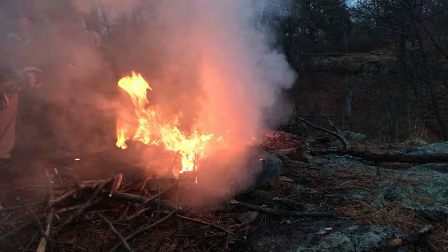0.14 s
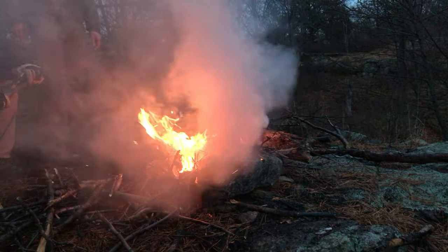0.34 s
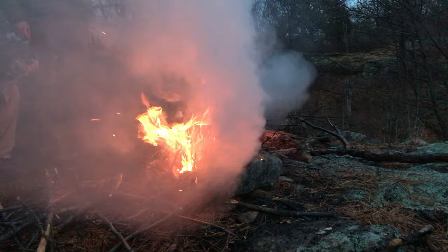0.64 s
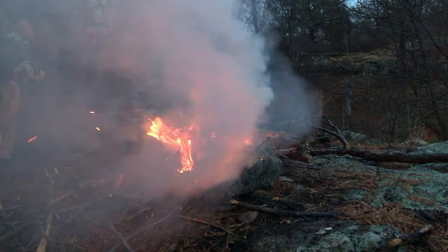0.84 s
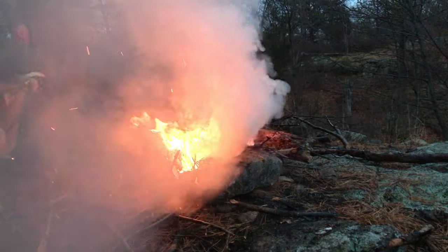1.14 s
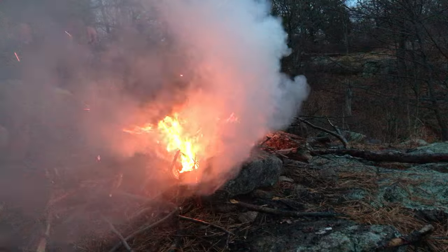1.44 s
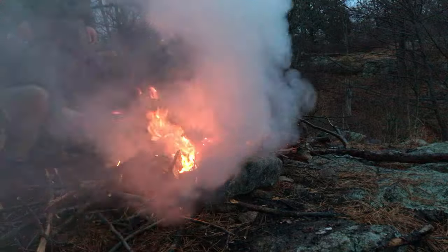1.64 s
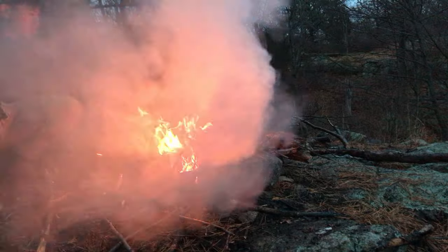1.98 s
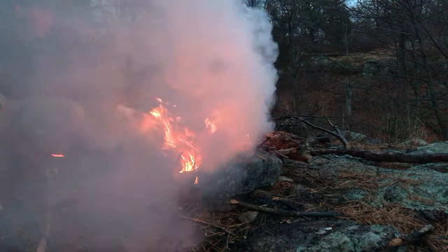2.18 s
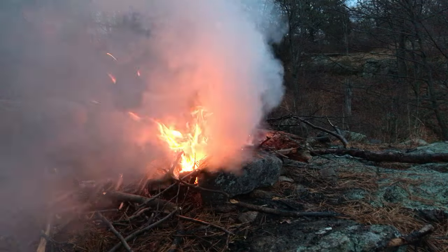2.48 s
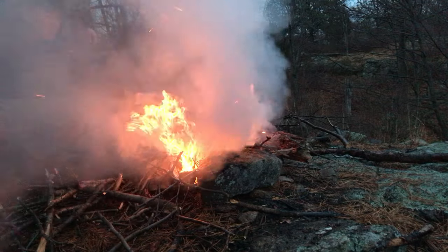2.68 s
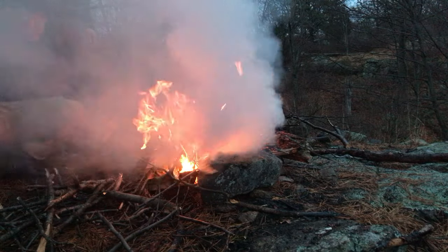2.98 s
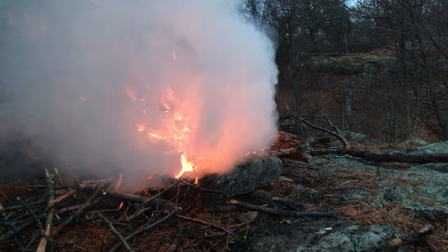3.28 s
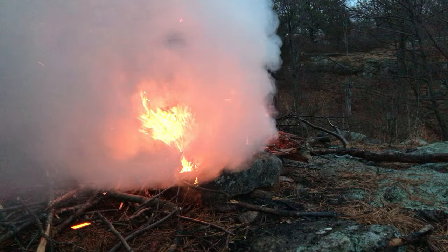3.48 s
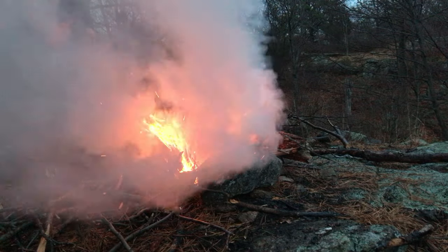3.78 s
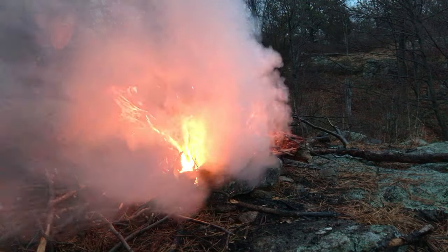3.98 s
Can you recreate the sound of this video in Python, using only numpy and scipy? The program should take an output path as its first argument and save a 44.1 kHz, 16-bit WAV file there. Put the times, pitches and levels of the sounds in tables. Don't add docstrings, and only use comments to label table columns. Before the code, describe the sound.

Dry needles and twigs burn hard outdoors, heard from a phone a few metres away. A low, soft flame roar and airy steam hiss run throughout, filled with countless tiny ticks. The opening has small clicks, and a very faint, very high sap whistle sinks slightly from 0.35 to 0.5 seconds. A hard crack bursts at 0.6 with a brief steam jet, followed by pops at 0.68 and 0.75. Sputtering hiss builds near 1.3, then a sharp snap lands at 1.36. Twigs tear and knock at 1.6 to 1.67; another very loud pop hits at 1.88, trailed by a dense clatter until 2.02. Lighter pops follow at 2.24 and 2.45, with a woody, ringing cluster around 2.6 to 2.7 and a knock near 2.85. From 3 seconds only sparse ticks and rustles remain, until a bright, tight double-step pop at 4.1. Short diffuse echoes come off ground and trunks.

```python
import sys
import numpy as np
from scipy import signal
from scipy.fft import rfft, irfft, next_fast_len
from scipy.io import wavfile
from scipy.ndimage import uniform_filter1d

SR = 44100
rng = np.random.default_rng(int(sys.argv[2]) if len(sys.argv) > 2 else 0)


def makeup_ratio(level_db):
    decades = np.asarray(level_db, float) / 20
    return 10 ** decades


def dump_mix(stems):
    frames = np.atleast_2d(stems).T
    limited = np.clip(frames, -1, 1)
    pcm = np.round(limited * 32767).astype(np.int16)
    wavfile.write(sys.argv[1], SR, pcm)


N = 181850

# centre in Hz, width in Hz, level in dB.
SNAP_MODES = [(1707, 950, -4), (2500, 3730, -5), (3590, 1680, -1), (4300, 1070, -7)]
SPIT_MODES = [(12550, 6600, -4), (15070, 4100, -7.5)]
# centre in Hz, width in Hz, level in dB.
TWIG_KNOCK_MODES = [(296, 700, -4.5), (500, 620, -2.5), (773, 420, -5.5), (1154, 870, -7)]
TWIG_CRACK_MODES = [(6100, 2300, -2.5), (8300, 2800, -7.5)]
TWIG_PARTS = (TWIG_KNOCK_MODES, SNAP_MODES, TWIG_CRACK_MODES, SPIT_MODES)


def ring(x, hz, width):
    b, a = signal.iirpeak(hz, hz / width, fs=SR)
    once = signal.lfilter(b, a, x + 1e-18)
    return signal.lfilter(b, a, once)


def unit(x):
    return x / np.sqrt(np.mean(x ** 2))


def norm(x):
    return np.linalg.norm(x, axis=-1, keepdims=True)


def walk(rate):
    hold = int(SR / rate)
    stairs = np.repeat(rng.standard_normal(N // hold + 1), hold)[:N]
    return 1.4 * uniform_filter1d(uniform_filter1d(stairs, hold), hold)


def pops():
    # start in seconds, energy in dB, brightness, narrowness, length in ms.
    resin_pockets = [(.202, -45, 0.3, -2.5, 1.7), (.4804, -40, 7.5, 1.8, 1.8), (.6006, -9.5, -1, 2, 1.4),
                     (.6779, -24.5, 1, 0.6, 0.22), (.7537, -20.5, 5.5, 0.54, 1.3),
                     (.8488, -39, 8.5, 1.4, 1.8), (1.154, -45, 4.5, -1, 1.3),
                     (1.1841, -35.5, 8.5, 2.5, 2.2), (1.3571, -13, 3.5, -.5, 0.45),
                     (1.417, -36.5, 5.5, 2.5, 0.42), (1.4816, -33.5, 10.5, 3, 0.16),
                     (1.5484, -27.5, 9.5, 0.64, 0.72), (1.8152, -39.5, 1, -1.5, 6.1),
                     (1.8402, -34, 0.5, 0, 3.1), (1.8653, -35, -6, 11, .8), (1.8806, -11.5, 0.7, 2, 0.58),
                     (1.954, -26, -6, 11, 1.8), (1.9617, -28.5, -1.3, 2, 4), (1.9803, -29.5, -3.5, 1.5, 5),
                     (1.9922, -43.5, -3, -2, 1.8), (2.2425, -30.5, 7, -0.15, 0.37),
                     (2.447, -29, 5.5, 1, 1.1), (2.672, -38, -4, -1, 1.2), (2.8348, -38, 3, -1, 0.27)]
    last_pop = [
        (4.0966, -54, 7, -3.5, .23),
        (4.0984, -32, 4, -3.5, 0.15),
    ]
    # start in seconds, energy in dB, brightness.
    resin_spits = [(.078, -51.5, 6.5), (0.289, -56.5, 9), (.7284, -52, 7), (0.7929, -46, 1), (.805, -42, 2),
                   (0.9628, -50, 4.5), (1.178, -42, 4.5), (1.334, -45, 5), (1.539, -53, 6),
                   (1.6976, -50, 4), (1.933, -53, 9), (1.97, -46, 3), (2.046, -42, 0.5), (2.1295, -49, 3.5),
                   (2.382, -48, .1), (2.6928, -39, 5), (3.221, -41.5, 2.5), (3.3325, -56, 3.5),
                   (3.34, -54, 3.5), (3.5977, -42.5, 3), (3.6435, -56.5, 6.5), (3.7205, -61, 5),
                   (3.738, -56, 5.5), (3.7468, -48.5, 3), (3.8218, -45.5, 4.5), (3.9098, -47, 3.5),
                   (3.9434, -43.5, 3.5), (4.057, -60, 7), (4.074, -60, 9)]
    # start in seconds, energy in dB, brightness, narrowness.
    bark_clicks = [(0.3256, -41.5, -.5, 9), (1.444, -50, 0, -1), (1.576, -60, 1, -4), (1.658, -58, 1, 5),
                   (2.024, -45, -2.5, 1), (2.078, -37.5, -5, 8), (2.168, -54, 1, 2), (2.5657, -49, 0, 3),
                   (2.632, -29.5, -6, 7), (2.735, -43, -0.5, 0), (2.8288, -53, 2, 3),
                   (2.939, -55.5, -5.5, -1.5), (3.055, -56, 0, -2), (3.1032, -37, 0.8, 1.2),
                   (3.3946, -52, 0.5, -1.5), (4.008, -41, -5, 8), (4.035, -46, 0, 4)]
    # start in seconds, energy in dB, brightness, narrowness, length in ms.
    tearing_twigs = [(.1846, -41.5, 7, 6, 1.6), (.5916, -39, -5, 11, 1.5), (.8911, -56.5, 8.5, -0.5, 3.3),
                     (.9065, -46, -0.5, -1, 5.3), (1.1212, -44, -1.5, -1, 2.9),
                     (1.2097, -51, -1, -1.5, 3.9), (1.2737, -32, -1.5, 1.8, 5.9), (1.405, -39, -2, -0.5, 6),
                     (1.6010, -21.5, -0.5, 2.5, 2.2), (1.6166, -27, -2.5, 1, 2.8),
                     (1.6460, -23, -4, 2.5, 7.6), (1.673, -39, -4, -1, 8.7), (1.688, -45.5, -5.5, -1, 4.1),
                     (1.9391, -29.5, -2, 6, 3.5), (2.0188, -29.5, -0.5, 2.5, 1.4),
                     (2.2112, -42, 7.5, -0.2, 3), (2.3192, -40.5, 6, 1.5, 3.7),
                     (2.5862, -40, -5, -0.6, 3.9), (2.6160, -31, -7, 4, 6.8), (2.6285, -35.5, -4, 1, 7),
                     (2.6502, -32.5, -2, -2, 3.5), (2.6585, -32.5, 3, 1.5, 7.4),
                     (2.6655, -24.5, 1, 1.5, 6.9), (2.848, -39.5, -3.5, -1.5, 8)]
    splinters = [(0.6034, -25, 3, 2, 6.3), (0.757, -33, -1, 6, 1.6), (1.3566, -37, 4, 0.5, 4),
                 (4.099, -36.5, 6, -1, 2)]
    # start in seconds, energy in dB, brightness, length in ms.
    settling = [(.2657, -56, 5, 6.7), (0.3915, -48.5, -5.5, 3.3), (.5239, -55, 5.5, 4.4),
                (0.539, -53, 5, 12), (.8362, -61, 1, 4.2), (0.983, -69, -2, 7.9), (1.067, -56.5, 5, 2.8),
                (2.0713, -42, -2, 2.3), (2.086, -59, 3, 2.3), (2.0892, -46, 0, 2), (2.1488, -47, 0, 2.3),
                (2.295, -44.5, .1, 2.2), (2.3706, -50, 1, 2.4), (2.5292, -59, 7, 4), (2.583, -54, 2, 4.9),
                (2.685, -39, -5.5, 4.6), (2.8195, -47, -5, 2), (2.9684, -53, 6.5, 3.3),
                (3.0313, -53, 6, 4.7), (3.1337, -58, 5.5, 2.7), (3.168, -57, -2, 3.7),
                (3.3169, -51, -1, 2.1), (3.3576, -62, 4, 2.4), (3.5245, -51.5, -5.5, 3.1),
                (3.5433, -59, 7.5, 2.5), (3.903, -53, 3, 2), (3.9249, -64, 3, 2.2),
                (3.9516, -42.5, -.5, 2.6), (3.9662, -49, -1, 7.2), (4.0224, -42.5, -1.5, 6)]
    # centre in Hz, width in Hz, level in dB.
    knock_modes = [(221, 206, -7), (400, 550, -7.5), (744, 350, -5), (1370, 1720, -3.5)]
    crack_modes = [(6000, 2750, -6), (8710, 2150, -6)]

    spits = [(*row, -0.13, 0.99) for row in resin_spits]  # narrowness, length in ms
    clicks = [(*row, 0.86) for row in bark_clicks]
    rustles = [(s, db, bright, 0.12, ms) for s, db, bright, ms in settling]
    resin = bursts(resin_pockets + last_pop + spits + clicks,
                   (knock_modes, SNAP_MODES, crack_modes, SPIT_MODES), echo_db=0.5, shock=0.64,
                   uneven_db=6.5, fade=0.81, rise_ms=0.089, gaps_db=.5)
    twigs = bursts(tearing_twigs + splinters + rustles, TWIG_PARTS, echo_db=4.0, shock=0.19,
                   uneven_db=3.0, fade=0.77, rise_ms=0.074, gaps_db=2.0)
    return resin + twigs


def bursts(table, parts, echo_db, shock, uneven_db, fade, rise_ms, gaps_db):
    part_octaves = (-2, 0, 1.2, 2.2)
    size = 5000
    out, ms = np.zeros(N + size), np.arange(size) * 1000 / SR
    noise = rng.standard_normal((4, len(table), size))
    click = np.eye(1, size)[0]
    s, db, bright, narrow, length = np.transpose(table)[:, :, None]
    envelope = (1 - np.exp(-ms / rise_ms)) * np.exp(-fade * ms / np.maximum(length, .2))
    volley = noise[0] * makeup_ratio(uneven_db * noise[1]) * envelope
    volley = volley * makeup_ratio(gaps_db * unit(uniform_filter1d(noise[1], size=50)))
    volley = volley / norm(volley) + shock * np.roll(click, 8)
    tail = makeup_ratio(echo_db) * echoes(noise[2:], ms)
    sound, sign = 0, 1
    for octave, modes in zip(part_octaves, parts):
        part_db = db + bright * octave - narrow * octave ** 2
        for hz, width, share_db in modes:
            direct = ring(volley, hz, width)
            both = direct / norm(direct) + ring(tail, hz, width) / norm(ring(click, hz, width))
            sound = sound + sign * makeup_ratio(part_db + share_db) * both * np.sqrt(SR / 1000)
            sign = -sign
    for at, one in zip((s[:, 0] * SR).astype(int), sound):
        out[at:at + size] += one
    return out[:N]


def echoes(noise, ms, gap_ms=2.4, beyond_db=-8.0):
    # level in dB, t60 in seconds, treble limit in Hz, last strong return in ms.
    scatter = [
        (-16, 0.11, 15000, 8.7),
        (-23, 0.32, 13000, 56),
    ]
    tail = 0
    for (db, t60, hz, last_ms), white in zip(scatter, noise):
        echo = white * np.exp(-np.log(1000) * ms / 1000 / t60) * np.clip(ms / gap_ms, 0, 1)
        echo = echo * makeup_ratio(beyond_db * np.clip(ms - last_ms, 0, 1))
        b, a = signal.butter(2, hz, fs=SR)
        tail = tail + makeup_ratio(db) * signal.lfilter(b, a, echo) / norm(echo)
    return tail


def sticks(rise_ms=0.17):
    # start in seconds, pitch in Hz, peak in dB, t60 in ms.
    struck_sticks = [(1.274, 1505, -33.5, 43), (1.275, 2150, -31, 27), (1.405, 620, -31.5, 38),
                     (1.602, 1080, -28, 32), (1.6029, 2620, -19, 16), (1.8807, 3370, 2.5, 2.9),
                     (1.94, 1490, -19.5, 8.2), (1.955, 2890, -12, 6.5), (1.9607, 4300, -13.5, 5.9),
                     (1.962, 730, -27.5, 21), (2.019, 2500, -25.5, 19), (2.588, 2800, -26, 8.5),
                     (2.652, 430, -25.5, 25), (2.667, 457, -22, 88), (2.668, 1080, -23, 33),
                     (2.849, 500, -30, 73), (3.95, 2420, -30.5, 14), (1.617, 5370, -21, 9.1),
                     (1.618, 3080, -23.5, 13), (1.623, 3300, -35, 12), (1.647, 4840, -21, 9.1),
                     (1.648, 2500, -19.5, 12), (1.650, 1540, -28, 25), (1.660, 2280, -33, 12),
                     (1.675, 2290, -31, 24), (1.815, 8730, -25.5, 10), (1.841, 4070, -25.5, 12),
                     (2.020, 1250, -32, 18), (2.6283, 1460, -24, 13), (2.633, 1500, -27, 18),
                     (2.6655, 1570, -18, 8), (2.673, 4400, -27, 16), (2.6925, 6400, -29, 6),
                     (2.8388, 426, -26, 17), (2.848, 1400, -31, 14), (2.849, 1950, -36, 18),
                     (2.864, 1900, -39, 14), (4.022, 1300, -42, 20), (4.033, 3100, -37, 12),
                     (2.023, 2900, -26, 8), (1.673, 4300, -31, 5.5), (2.82, 950, -35, 12),
                     (1.39, 2400, -33, 6), (3.078, 690, -38.5, 30)]
    pocket_walls = [(4.0987, 16300, -13, 4), (4.0986, 8470, -7.5, 3.3), (4.1, 6800, -14, 4.4),
                    (4.0994, 3800, -19.5, 5.7), (.7537, 4560, -17, 4.5), (.7537, 3020, -15.5, 6.3),
                    (.678, 5800, -21, 4.5), (2.447, 1670, -30, 6.4), (2.243, 2860, -23, 4.8),
                    (.6018, 3700, -14, 3.7), (.6012, 5890, -9, 4), (1.8807, 11400, -5.5, 2.7),
                    (1.8807, 5240, -8.5, 2.7), (1.5486, 9600, -12.5, 5.2), (1.3575, 12100, -9, 7),
                    (1.3585, 8900, -10, 4), (1.3713, 9500, -23, 4), (.6008, 2200, -10, 5),
                    (4.0988, 900, -24, 6), (1.363, 3200, -26, 5)]
    size = SR // 5
    out, ms = np.zeros(N + size), np.arange(size) * 1000 / SR
    for s, hz, db, t60 in struck_sticks + pocket_walls:
        shape = (1 - np.exp(-ms / rise_ms)) * np.exp(-np.log(1000) * ms / t60)
        at = int(s * SR)
        out[at:at + size] += makeup_ratio(db) * shape * np.sin(2 * np.pi * hz * ms / 1000)
    return out[:N]


def embers():
    # start in seconds, energy in dB, brightness in dB per octave, length in ms.
    flakes = [(.607, -34, 2, 1.8), (0.651, -58, 6, 1), (.682, -48, 7, 3), (.713, -50, 3, 1),
              (.742, -61, 6, 1), (0.76, -45, 7, 1.5), (1.2445, -53, 3, 1), (1.262, -52, 5, 2),
              (1.292, -48, 2, 1.5), (1.314, -41, 3, 1), (1.325, -46, 1, 1.5), (1.349, -48, -3, 2),
              (1.3607, -45, 10, 1.5), (1.371, -51, 8, .7), (1.382, -58, 10, 1), (1.39, -46, -3, 1.5),
              (1.826, -56, 5, 2), (1.85, -52, 4, 1), (1.86, -60, 0, 1.02), (1.954, -44.5, 8, .7),
              (2.638, -47, 1, 2), (2.6748, -39, 4, 1.5), (2.681, -39, 1, 3.6), (2.684, -34, -2, 2.8),
              (2.699, -44, 0, 3), (2.864, -47, -3, 2), (4.0875, -60, 8, .5), (4.113, -47, 6, 1),
              (4.1215, -59, 10, .5), (.626, -52, 4.5, 1), (1.5512, -41, 2, 4), (1.563, -50, 2, 1),
              (2.9465, -52, -4, 4), (3.05, -52, -6, 5), (3.365, -54, -6, 4), (3.385, -52, -8, 6),
              (.11, -52, -5, 5), (.37, -59, -2, 4), (.405, -53, -7.5, 4), (4.1005, -40, 6, 1.5),
              (4.109, -52, 8, 1.5), (1.8144, -49, 4, 1), (1.423, -48, 2, 4), (1.66, -58, 8, 6),
              (1.677, -60, 5, 4), (3.995, -51, -2, 6), (4.045, -50, 2, 4), (2.875, -50, -5, 8)]
    # start in seconds, energy in dB, brightness in dB per octave,
    # narrowness in dB per octave squared, length in ms.
    sharp_ticks = [(.062, -48, -1, 3, 12), (.085, -50, -1, 4, 8), (.332, -50, -2, 3, 10),
                   (.383, -49, -1, 4, 10), (.4875, -56, 7, 0, 1), (.6018, -24, 1, 3, .6),
                   (1.238, -58, 9, 0, 4), (1.3582, -26, 7, 1, .8), (1.385, -58, 8, 1, 8),
                   (1.6165, -42, 6, 1, .8), (1.6455, -54, 8, 0, 2), (1.653, -62, 10, 1, 2),
                   (1.6695, -63, 10, 0.5, 1), (1.676, -61, 11.5, 0.5, .6), (1.927, -62, 12, 0, 3),
                   (1.939, -60, 11, 0, 1), (1.9625, -52, 8, 0, 1.5), (1.9757, -54, 6, 0, .6),
                   (1.9922, -44, 6, 3, .6), (2.0222, -52, 6, 0, 1), (2.0925, -50, 6, 2, 1),
                   (2.565, -50, 3, 2, 1), (2.6305, -48, 5, 0, 3), (2.6585, -48, 6, 0, 2),
                   (2.6678, -46, 7, -2, .5), (2.8405, -45, -5, 1, 2), (3.1715, -46, 0, 3, 1),
                   (3.967, -46, 0, 4, 1.5), (3.9915, -62, 10, 0, .7), (4.031, -47, -1, 4, 2)]
    rows = [(s, db, bright, .2, ms) for s, db, bright, ms in flakes] + sharp_ticks
    return bursts(rows, TWIG_PARTS, echo_db=6.0, shock=0.34, uneven_db=4.5, fade=0.87,
                  rise_ms=0.052, gaps_db=-1.0)


def needles(ticks_per_s=400, spread_db=3., below_steam_db=-8):
    count = int(ticks_per_s * N / SR)
    when, big, sign = rng.random((count, 3)).T
    x = np.zeros(N)
    size_db = -spread_db * np.log(1 - np.minimum(big, .985))
    x[(when * N).astype(int)] = np.sign(sign - .5) * makeup_ratio(size_db)
    *_, steam_db, fine_db = layers_db()
    coarse = unit(ring(x, 4200, 4600)) * makeup_ratio(steam_db)
    fine = unit(ring(x, 16000, 10000)) * makeup_ratio(fine_db)
    return makeup_ratio(below_steam_db) * (coarse + fine)


def vent(sputter_db=1.5):
    # time in seconds, level in dB.
    vent_course = [(1.19, -66), (1.225, -52), (1.26, -50), (1.3, -45), (1.325, -45), (1.352, -48),
                   (1.37, -60)]
    # centre in Hz, width in Hz, level in dB.
    vent_bands = [(3400, 900, -2), (4400, 1200, 0), (5900, 1600, -2)]
    air = rng.standard_normal(N)
    hiss, sign = 0, 1
    for hz, width, db in vent_bands:
        hiss = hiss + sign * makeup_ratio(db) * unit(ring(air, hz, width))
        sign = -sign
    level_db = np.interp(np.arange(N) / SR, *np.transpose(vent_course), left=-150, right=-150)
    return unit(hiss) * makeup_ratio(level_db + sputter_db * walk(120))


def whistle():
    # time in seconds, pitch in Hz, level in dB.
    sap_jet = [(.343, 15600, -64), (.352, 15240, -52), (.366, 15200, -61), (.39, 15150, -55),
               (.44, 14970, -57), (.476, 14830, -59), (.497, 14720, -60), (.512, 14520, -68)]
    s, hz, db = np.transpose(sap_jet)
    t = np.arange(N) / SR
    loudness = makeup_ratio(np.interp(t, s, db, left=-150, right=-150) + walk(82))
    phase = 2 * np.pi * np.cumsum(np.interp(t, s, hz)) / SR
    return np.sqrt(2) * loudness * np.sin(phase)


def blaze(gust_db=.5, flicker_db=1.3, sputter_db=1.1):
    # frequency in Hz, level in dB per Hz.
    haze = [(20, -34), (55, -2), (100, -3.5), (560, -22), (2180, -29), (5000, -29), (7650, -30),
            (15800, -26.5)]
    layer_edges_hz = (400, 2500, 8000)
    layer_centres_hz = (130, 1400, 3600, 12000)
    hz, db = np.transpose(haze)
    size = next_fast_len(N)
    f = np.fft.rfftfreq(size, 1 / SR) + 1
    colour = makeup_ratio(np.interp(np.log(f), np.log(hz), db))
    layer = np.searchsorted(layer_edges_hz, f)
    bare = [np.sum(colour[layer == k] ** 2) / len(f) for k in range(4)]
    swell_db = layers_db() - 10 * np.log10(bare)[:, None]
    out, gust, sputter = 0, walk(17), walk(150)
    for centre in 20 * 2 ** np.arange(0, 10, .5):
        window = np.cos(np.pi * np.clip(np.log2(f / centre), -.5, .5))
        band = irfft(rfft(rng.standard_normal(N), size) * colour * window, size)[:N]
        shares = np.array([np.interp(np.log(centre), np.log(layer_centres_hz), one) for one in np.eye(4)])
        ragged_db = gust_db * gust + flicker_db * walk(12) + sputter_db * (1 - shares[0]) * sputter
        out = out + band * makeup_ratio(shares @ swell_db + ragged_db)
    return out


def layers_db():
    calm_db = (-40, -55, -60, -60)
    # time in seconds, swell of the roar in dB.
    draught = [(0, -0.3), (.45, 0.5), (.7, 3), (1.0, 0), (1.5, 0.5), (2.2, 0), (2.55, -0.5), (2.85, -0.1),
               (3.3, 0.5), (4.12, -0.7)]
    # middle in seconds, swell in dB, brightness in dB per layer,
    # half length in seconds.
    puffs = [(.0, 1.5, 4.5, 0.04), (0.103, 3.5, -2, 0.1), (0.316, 5, 0.5, 0.079), (0.675, 7, 1, 0.057),
             (0.794, 0.5, 1.5, 0.095), (0.89, 3.5, 3.5, 0.055), (1.105, 9.5, 1, 0.037), (1.2, 6, 3.5, 0.15),
             (1.294, 9, 5, 0.1), (1.418, 7, 1.5, 0.055), (1.633, 7.5, 2, 0.12), (1.95, 10, 2.5, 0.14),
             (2.31, 7.5, 4.5, 0.072), (2.694, 3.5, 0.5, 0.058), (2.992, 3.5, 0.5, 0.23),
             (3.2, 1.5, 0.5, 0.032), (3.395, 1.5, 0, 0.036), (3.696, -1.5, 1.5, 0.2),
             (3.999, 12.5, 1.5, 0.062), (4.12, 1, 3, 0.086)]
    puff_share = (0.71, 0.91, 0.51)
    # middle in seconds, extra steam in dB, half length in seconds.
    jets = [
        (0.625, 18, 0.02),
        (4.0, -5.5, 0.094),
        (3.3, 0, 0.091),
    ]
    t = np.arange(N) / SR
    out = np.array(calm_db, float)[:, None] + np.zeros(N)
    out[0] += np.interp(t, *np.transpose(draught))
    for s, db, bright_db, half in puffs:
        swell = db * np.array(puff_share) + bright_db * np.array([-1, 0, 1])
        out[1:] += swell[:, None] * np.exp(-((t - s) / half) ** 2)
    for s, db, half in jets:
        out[2] += db * np.exp(-((t - s) / half) ** 2)
    return out


def scene():
    breaking = pops() + sticks() + embers() + needles()
    return (breaking + vent() + whistle() + blaze())[None]


def top_cut(x):
    return signal.sosfilt(signal.butter(12, 17080, fs=SR, output="sos"), x)


def record(dry):
    # centre in Hz, width in Hz, depth in dB.
    port_dips = [(7560, 420, -2), (10700, 590, -3)]
    top_hz, quiet_top_hz, gate_db = 16600, 15800, -52
    f, spectrum = np.fft.rfftfreq(N, 1 / SR), rfft(dry)
    spectrum = spectrum * makeup_ratio(sum(db * np.exp(-((f - hz) / width) ** 2) for hz, width, db in port_dips))

    def fall(hz, width):
        return np.clip((hz - f) / width + .5, 0, 1)

    body = irfft(spectrum * fall(quiet_top_hz, 150), N)
    treble = irfft(spectrum * fall(top_hz, 1000), N) - body
    is_loud = uniform_filter1d(treble ** 2, size=128) > makeup_ratio(gate_db) ** 2
    mix = body + treble * uniform_filter1d(1. * is_loud, size=64)
    mix = np.clip(mix, -1, 1)
    return top_cut(mix)


dry = scene()
out = record(dry)
dump_mix(out)
```